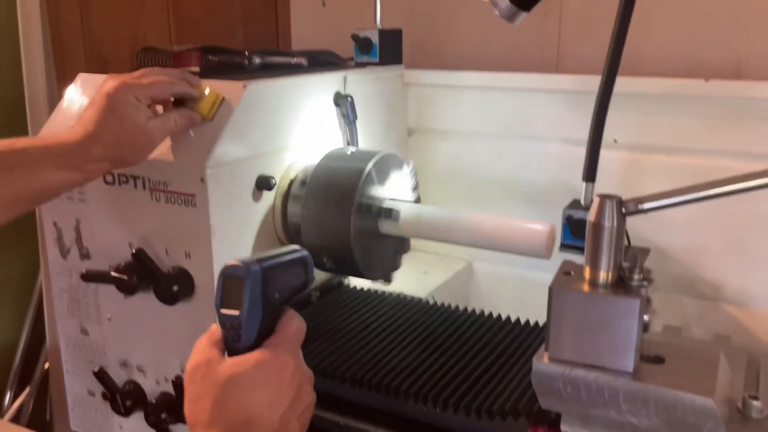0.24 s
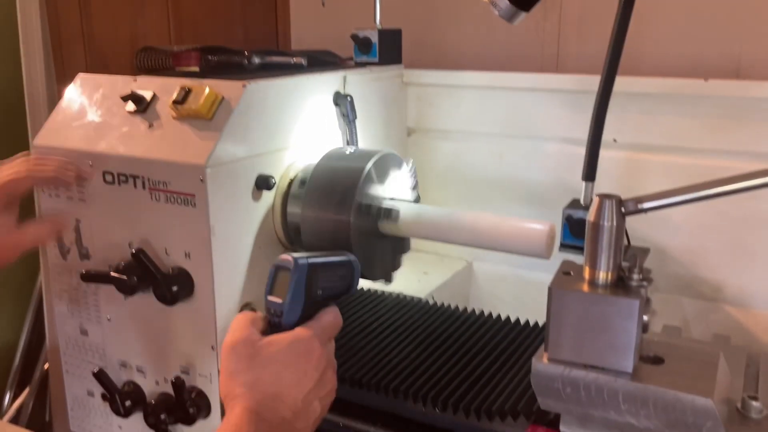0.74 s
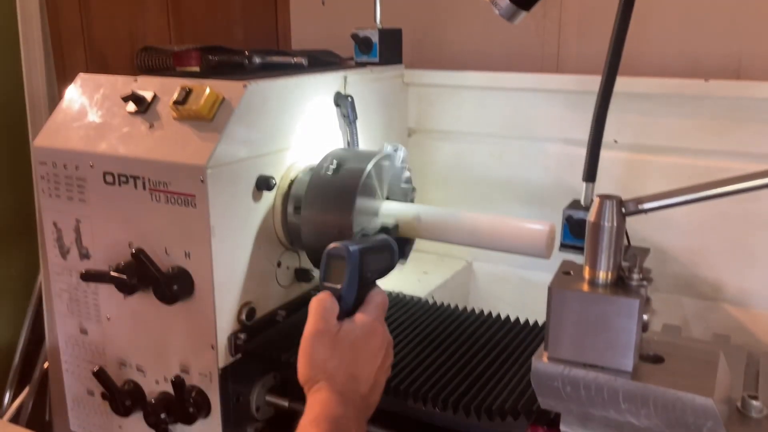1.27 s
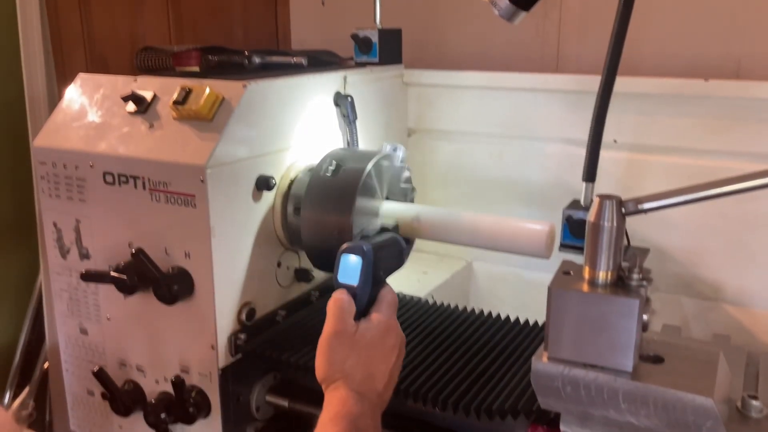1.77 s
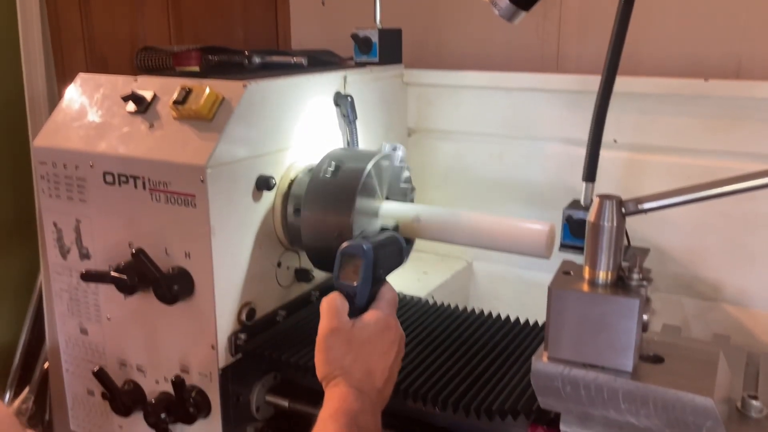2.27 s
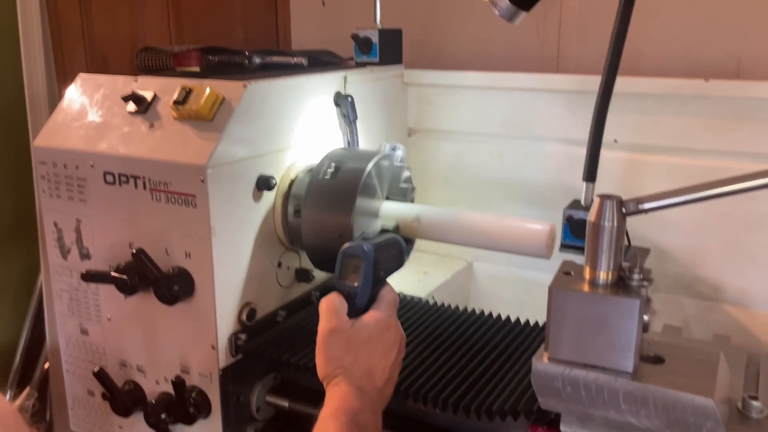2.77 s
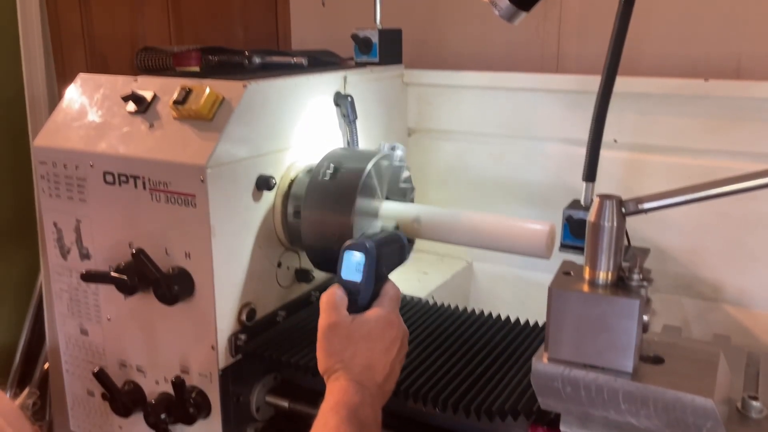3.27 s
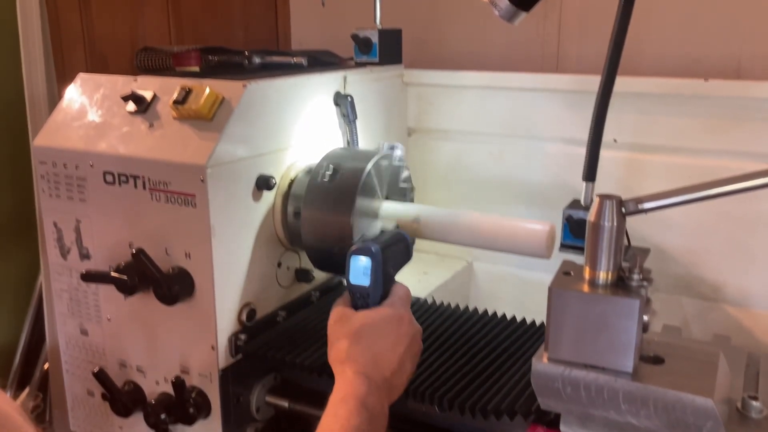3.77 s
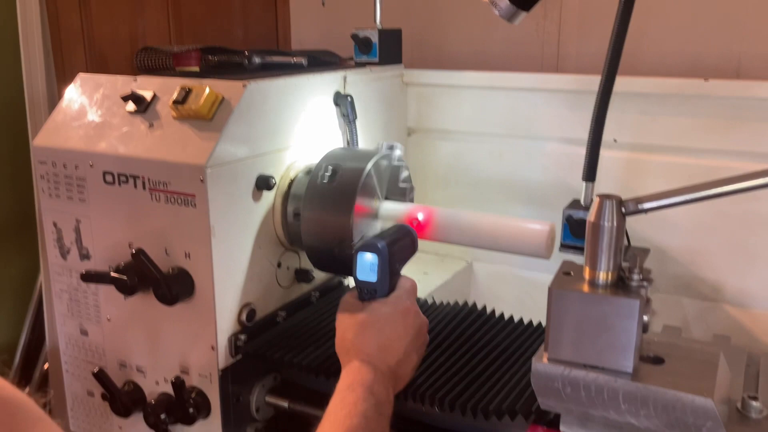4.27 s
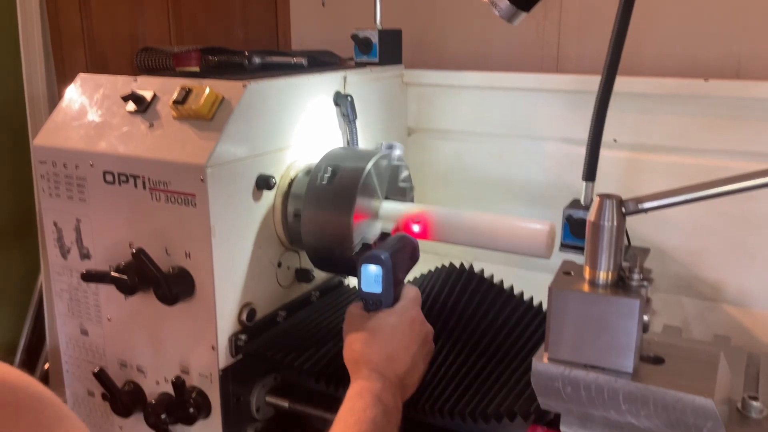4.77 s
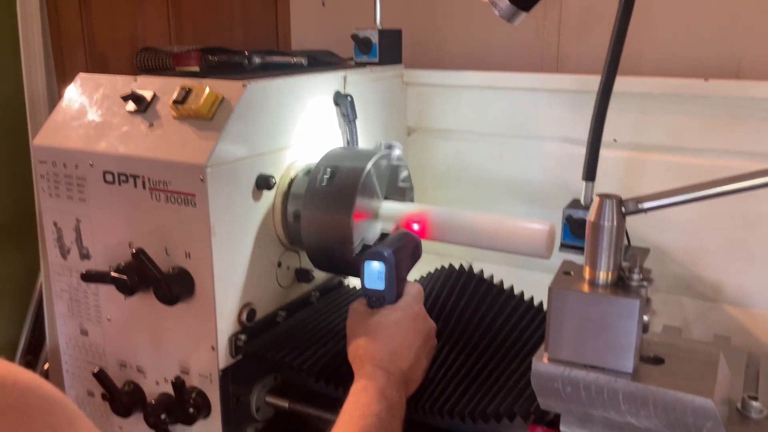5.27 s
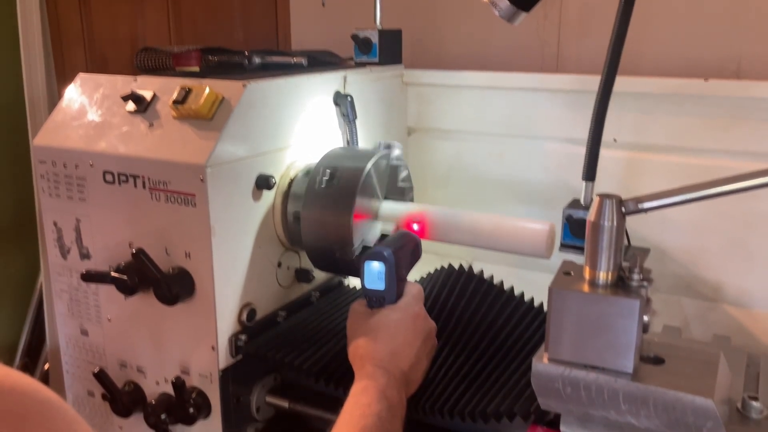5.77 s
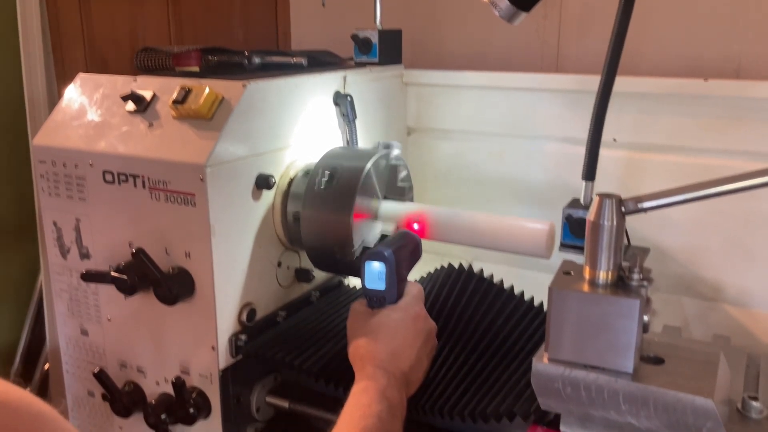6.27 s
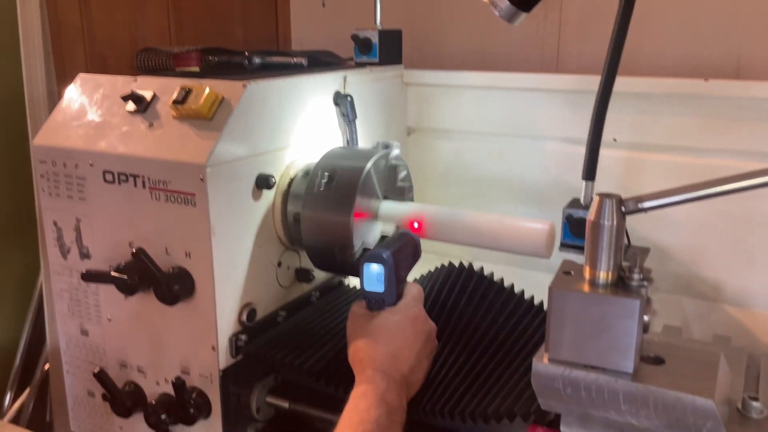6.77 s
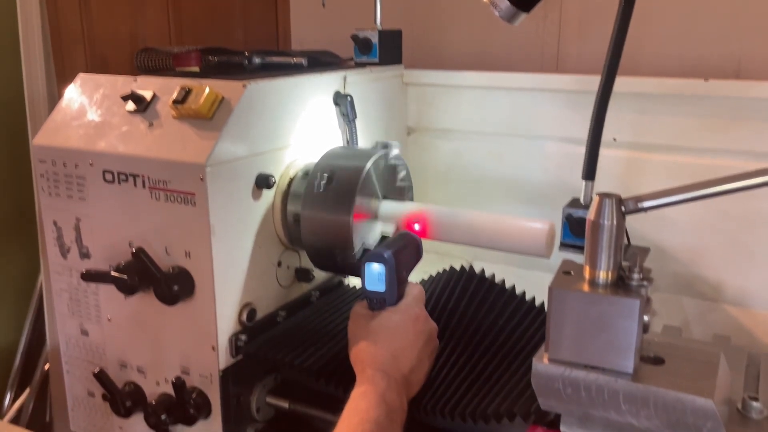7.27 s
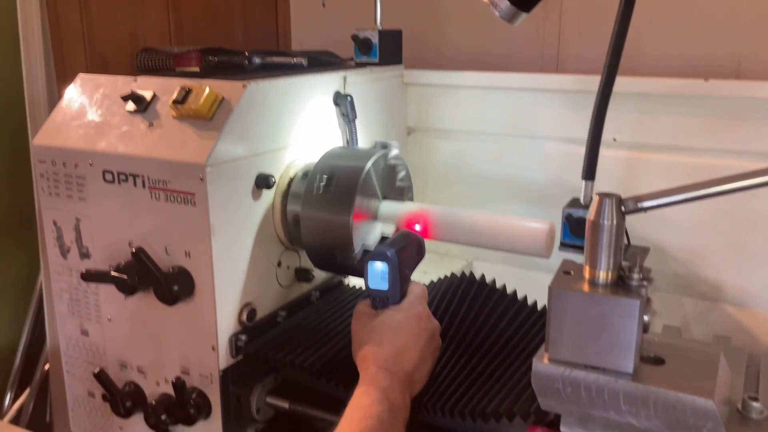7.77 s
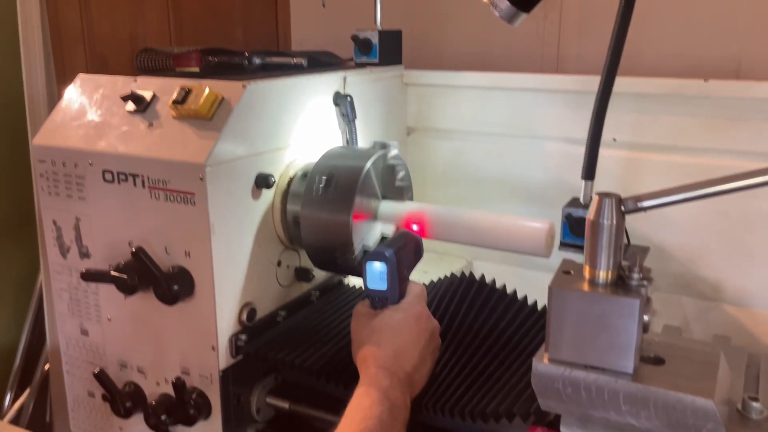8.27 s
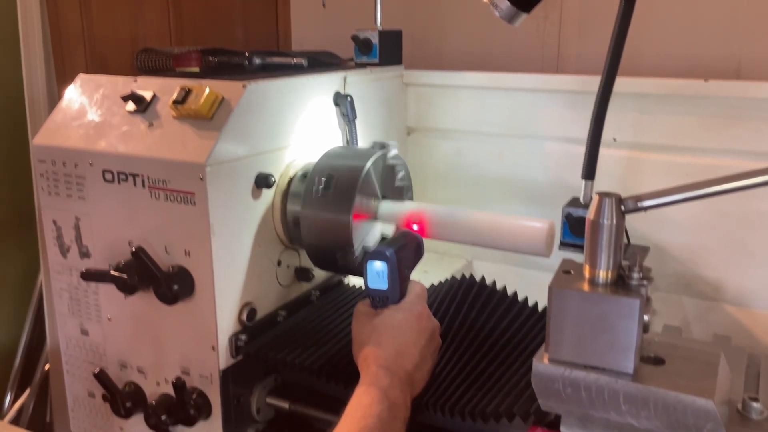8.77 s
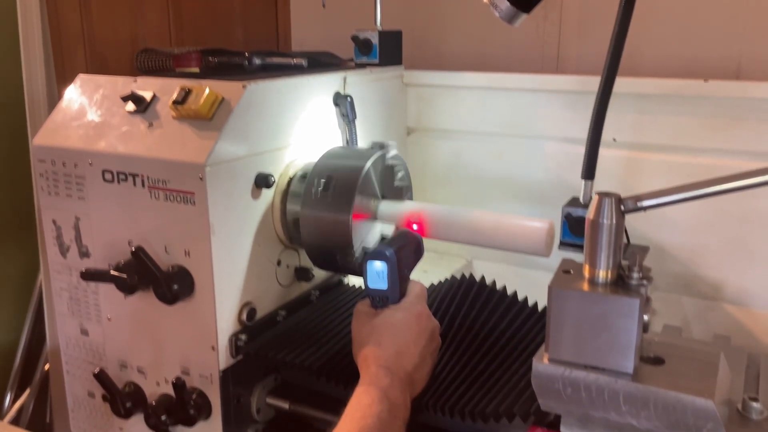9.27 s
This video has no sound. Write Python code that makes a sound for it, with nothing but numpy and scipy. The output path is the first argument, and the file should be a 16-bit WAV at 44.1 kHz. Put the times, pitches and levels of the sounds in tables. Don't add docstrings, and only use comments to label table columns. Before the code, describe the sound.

A small metal lathe starts with a thump and gear crash, then idles with steady hum, rough gear roar, loose rattling and a few plastic trigger clicks.

```python
import sys
import numpy as np
from scipy import signal
from scipy.fft import rfft, irfft, next_fast_len
from scipy.io import wavfile

SR = 44100
rng = np.random.default_rng(int(sys.argv[2]) if len(sys.argv) > 2 else 0)


def store_pcm(level_fs):
    pcm = np.round(np.clip(level_fs, -1, 1) * 32767).astype(np.int16)
    wavfile.write(sys.argv[1], SR, np.atleast_2d(pcm).T)


def level_to_linear(level):
    exponent = np.asarray(level, float) / 20
    return 10 ** exponent


N = 420273
SIZE = next_fast_len(N)
HZ = np.arange(SIZE // 2 + 1) * SR / SIZE


def rms_one(x):
    return x / np.sqrt(np.mean(x ** 2) + 1e-20)


def at_hz(points, hz):
    point_hz, value = np.transpose(points)
    return np.interp(np.log(hz), np.log(point_hz), value)


def coloured(spectrum, count):
    white = rfft(rng.standard_normal((count, SIZE)))
    return irfft(white * level_to_linear(at_hz(spectrum, HZ + 1)), SIZE)[:, :N]


def drift(rate_hz):
    r = np.exp(-80 * np.pi * rate_hz / SR)
    steps = rng.standard_normal(N // 40 + 2002)
    slow = signal.lfilter([1], [1, -2 * r, r * r], steps)[2000:]
    return np.interp(np.arange(N) / 40, np.arange(len(slow)), rms_one(slow))


def ring(clicks, hz, t60_s):
    r = level_to_linear(-60 / (t60_s * SR))
    w = 2 * np.pi * hz / SR
    return signal.lfilter([0, np.sin(w)], [1, -2 * r * np.cos(w), r * r], clicks + 1e-18)


def band(x, low_hz, high_hz):
    return signal.sosfilt(signal.butter(2, [low_hz, high_hz], "band", fs=SR, output="sos"), x)


def left_right(mid, side):
    return np.array([mid + side, mid - side])


def first_second(x):
    return np.pad(x, [(0, 0), (0, N - SR)])


def in_time(rows):
    s, value = np.transpose(rows)
    return np.interp(np.arange(N) / SR, s, value)


def swing(level_db):
    return level_db - np.median(level_db)


# pitch_hz, level_db (per Hz)
ROAR_COMMON = [(90, -33), (230, -10.5), (480, -4.5), (570, -8), (680, -1.5), (1200, -8.5), (1600, -9.5),
               (2600, -16), (3000, -20.5), (5000, -26), (5800, -34), (8000, -36.5), (11000, -41.5),
               (14900, -50), (15300, -72)]
# pitch_hz, level_db (per Hz)
ROAR_OPPOSITE = [(90, -57), (180, -41), (340, -31), (400, -17), (560, -17.5), (670, -9.5), (1300, -9),
                 (2600, -17.5), (3000, -22), (5000, -29), (6300, -36.5), (9000, -38.5), (14800, -53.5),
                 (15500, -66)]


def roar(roar_db, rattle_db, side_db, patchy_db):
    mid = coloured(ROAR_COMMON, count=2)
    side = level_to_linear(side_db) * coloured(ROAR_OPPOSITE, count=2)
    noise = np.stack([mid, side], axis=1)
    edges_hz = 80 * 2 ** np.arange(0, 8.1, 0.5)
    together = drift(16)
    out = 0
    for k, (low, high) in enumerate(zip(edges_hz, edges_hz[1:])):
        bright = np.clip(np.log2(low / 1100) / 6.6, 0, 1)
        load_db = (1 - bright) * swing(roar_db) + 0.84 * bright * swing(rattle_db)
        flicker_db = patchy_db * (0.67 * bright * together + drift(21))
        out = out + level_to_linear(load_db + flicker_db) * band(noise[k % 2], low, high)
    return rms_one(left_right(*out))


WHEEL_HZ = [1562, 1662, 2020, 2200, 2280, 2350, 2414, 2541, 2690, 2712, 3200, 3415, 3775, 3850, 4305, 4385]
# level_db, t60_s (time to fall 60 dB)
WHEEL_RING = [(0.5, 0.07), (5, 0.052), (-0.5, 0.13), (-9, 0.1), (-2, 0.078), (-2, 0.065), (-5, 0.16),
              (-4, 0.092), (-0.5, 0.045), (-2, 0.043), (-7, 0.044), (-5.5, 0.053), (-4.5, 0.049),
              (-4.5, 0.067), (-1.5, 0.063), (-3.5, 0.049)]


def rattle(rattle_db, per_s, level_db, spread_db):
    born = np.flatnonzero(rng.random(N) < per_s * level_to_linear(2.8 * drift(9)) / SR)
    luck = np.minimum(rng.exponential(1, len(born)), 2.5)
    sizes = level_to_linear(rattle_db[born] + level_db + spread_db * luck)
    hard, peak_db, hit_hz = tooth_blows(rattle_db)
    mid, side, blows = np.zeros((3, N))
    for k, (hz, (wheel_db, t60_s)) in enumerate(zip(WHEEL_HZ, WHEEL_RING)):
        loss_db = np.minimum(32 * np.abs(np.log2(hz / hit_hz)), 6)
        blow_db = peak_db - 8.5 - loss_db + rng.normal(0, 1.3, len(hard))
        blow_db = blow_db + 3.9 * (2600 < hz < 3000) - 5.5 * (hz < 2600)
        clicks = np.zeros(N)
        clicks[born] = sizes * rng.standard_normal(len(born))
        clicks[hard] += level_to_linear(blow_db + 5.5) * (-1) ** k
        wheel = level_to_linear(wheel_db) * ring(clicks, hz, t60_s)
        mid += wheel
        side += wheel * rng.uniform(-0.14, 1.0) * min(1, 1500 / hz)
    blows[born] = sizes * level_to_linear(-5.5)
    blows[hard] += level_to_linear(peak_db - 4.5)
    burst = signal.lfilter([1], [1, -level_to_linear(-60 / (0.047 * SR))], blows)
    crack = band(rng.standard_normal((2, N)), 4900, 10100)
    return left_right(mid, side) * level_to_linear(0.5), level_to_linear(-9.5) * burst * crack


CHATTER_DB = -49
# start_s, peak_db, pitch_hz (of the wheel hit)
HARD_BLOWS = [(0.4334, -31, 4330), (0.631, -30, 4300), (0.6923, -34.5, 4310), (0.9235, -32.5, 2670),
              (1.372, -27.5, 2700), (1.6457, -33, 4300), (2.1635, -32, 4310), (2.9214, -31, 2710),
              (3.044, -29, 2700), (3.2425, -30.5, 2710), (3.7229, -32.5, 4300), (3.7743, -33, 4390),
              (3.865, -29.5, 4290), (3.9627, -32.5, 2700), (4.1841, -31, 2710), (4.7845, -35, 4310),
              (5.0469, -27.5, 3830), (5.1863, -32, 2740), (5.4083, -28, 2720), (5.5523, -31, 3850),
              (5.6855, -42, 2700), (5.796, -36, 4380), (6.271, -34, 4300), (6.415, -31, 4390),
              (6.6538, -36, 2690), (6.9207, -31.5, 2700), (7.2529, -31.5, 2700), (7.971, -33, 4310),
              (8.116, -26.5, 4450), (8.423, -35, 2680)]


def tooth_blows(rattle_db):
    light_per_s, light_mean_db, light_spread_db = 11, -39, 0.4
    chance = light_per_s * level_to_linear(rattle_db - CHATTER_DB) / SR
    light = np.flatnonzero(rng.random(N) < chance)
    luck = rng.random((N // 1000, 2))[:len(light)]
    s, peak_db, hit_hz = np.transpose(HARD_BLOWS)
    light_hz = np.array([2700, 3800, 4350])[(3 * luck[:, 1]).astype(int)]
    light_db = light_mean_db + light_spread_db * (4 * luck[:, 0] - 2)
    hard = np.round(s * SR).astype(int)
    return np.r_[hard, light], np.r_[peak_db, light_db], np.r_[hit_hz, light_hz]


# start_s, peak_db, gap_ms (between touches)
CLUNKS = [(0.257, -49, 5), (0.865, -20.5, 7), (1.186, -35, 5), (1.616, -20.5, 6), (1.985, -23.5, 6),
          (2.883, -22, 5), (2.956, -24, 7), (3.372, -22.5, .1), (3.635, -23, 6), (4.096, -21, 4),
          (4.444, -25, 6), (4.535, -17, 7), (4.998, -25, .1), (5.555, -23, 4), (5.613, -21.5, .1),
          (5.684, -24, 5), (5.87, -29, 5), (6.268, -23, 5), (6.655, -22, 5), (6.915, -16, 7.5),
          (7.255, -21, 3), (7.348, -29, 6), (7.52, -25, 6), (7.617, -20, 6), (7.64, -20, 15),
          (8.12, -28, 4), (8.368, -18, 14), (8.524, -27, 5), (9.185, -17, 8), (9.294, -29, 5)]
# pitch_hz, level_db, t60_s
CLUNK_BODY = [(650, -10.5, 0.15), (845, 0, 0.027), (952, -8, 0.082), (1180, 5.5, 0.036), (1236, 6.5, 0.01),
              (1368, -0.5, 0.054), (1738, -9.5, 0.072)]


def clunks():
    s, peak_db, gap_ms = np.transpose(CLUNKS)
    touch_s = s[:, None] + gap_ms[:, None] / 1000 * np.arange(3)
    touches = np.round(touch_s * SR).astype(int)
    out = np.zeros((2, N))
    for hz, level_db, t60_s in CLUNK_BODY:
        touch_db = peak_db[:, None] - 15 + level_db + [-4, 0, -2]
        touch_db = touch_db + rng.normal(0, 2.0, touches.shape)
        clicks = np.zeros(N)
        clicks[touches] = level_to_linear(touch_db) * rng.choice([-1, 1], (len(s), 1))
        out += ring(clicks, hz, t60_s) * left_right(1, rng.uniform(-0.16, 0.63))[:, None]
    return out


# start_s, level_db
SLACK = [(0.35, -47), (1.19, -46), (1.6, -45.5), (1.83, -47.5), (2.73, -46), (3.18, -46), (3.47, -48.5),
         (3.95, -46.5), (4.18, -46), (5.49, -45.5), (5.74, -44.5), (6.38, -46.5), (8.02, -46.5),
         (8.22, -45), (8.53, -46), (9.53, -46)]


def controls():
    slack_db = swing(in_time(SLACK))
    start_db = 11 * np.exp(-np.arange(N) / SR / 0.088)
    s, peak_db, _ = np.transpose(CLUNKS)
    kicks = np.zeros(N)
    kicks[np.round(s * SR).astype(int)] = level_to_linear(peak_db + 6)
    swell_db = 4.7 * signal.lfilter([1], [1, -np.exp(-1 / (0.067 * SR))], kicks + 1e-18)
    wobble_hz = 6
    roar_db = start_db + 0.9 * slack_db + swell_db + 0.9 * drift(wobble_hz)
    rattle_db = CHATTER_DB + 0.35 * start_db + slack_db + 1.97 * drift(wobble_hz)
    return roar_db, rattle_db


# pitch_hz, width_hz, level_db, alike (left-right likeness, 0 to 1)
CASING = [(72.7, 11, -44.5, .98), (162.4, 1.8, -49.5, 0.79), (218.6, 52, -48, .98), (265.5, 11, -57, .98),
          (309, 25, -54, 0.9), (384, 21, -45, 0.56), (487, 30, -54, 0.24), (513.6, 14, -47, 0.36),
          (674, 4.5, -46.5, 0.31), (698.6, 18, -43.5, 0.46), (789, 17, -53.5, 0.64), (945, 31, -47, 0.12),
          (1039, 49, -44.5, 0.9), (1163, 90, -40.5, 0.86), (1297, 51, -43.5, 0.39)]


def casing(roar_db):
    out = np.zeros((2, N))
    white = rng.standard_normal((2, 2, N))
    for k, (hz, width_hz, level_db, alike) in enumerate(CASING):
        t60_s = np.log(1000) / np.pi / width_hz
        mid, side = ring(white[k % 2], hz, t60_s)
        panel = left_right(np.sqrt(1 + alike) * mid, np.sqrt(1 - alike) * side)
        out += level_to_linear(level_db) * rms_one(panel)
    return band(out, 96, 1630) * level_to_linear(0.97 * swing(roar_db))


HUM_DB = [-23, -33.5, -41.5, -41.5, -50, -45.5]
# multiple, left_minus_right_db, left_lag_ms
HUM_PLACE = [(1, -4.1, .16), (2, 2.2, .45), (3, -.9, -.05), (4, 2.7, -.26), (6, 1, .03), (8, 1, 0)]


def hum():
    hum_hz = 99.95
    t = np.arange(N) / SR - 0.0006
    out = np.zeros((2, N))
    for level_db, (k, pan_db, lag_ms) in zip(HUM_DB, HUM_PLACE):
        turn = 2 * np.pi * k * hum_hz
        shift = np.pi / 2 * (k > 1)
        out[0] += level_to_linear(level_db + pan_db / 2) * np.cos(turn * (t - lag_ms / 2000) - shift)
        out[1] += level_to_linear(level_db - pan_db / 2) * np.cos(turn * (t + lag_ms / 2000) - shift)
    return out * level_to_linear(0.082 * drift(5.2) + 0.3 * drift(3.7))


# pitch_hz, level_db, t60_s, start_s
THUMP = [(73.4, -16.5, 0.59, 0.0062), (123, -20.5, 0.54, 0.0192), (158.4, -22, 0.47, 0.0017),
         (226, -27, 0.58, 0.0033), (290, -26, 0.42, 0.0011), (496, -25.5, 0.52, 0.0019)]


def start_thump():
    out = np.zeros((2, SR))
    for hz, level_db, t60_s, start_s in THUMP:
        t = np.maximum(np.arange(SR) / SR - start_s, 0)
        rise = 1 - np.exp(-t * hz / 3.6)
        out += level_to_linear(level_db - 60 * t / t60_s) * rise * np.sin(2 * np.pi * hz * t)
    return first_second(out)


def start_clatter():
    t = np.arange(SR) / SR
    grains = rng.standard_normal((2, SR))
    contacts = grains * (0.31 + (rng.random(SR) < 900 / SR) * 2.4)
    crash = rms_one(band(band(contacts, 220, 2500), 150, 8300))
    large_wheel = rms_one(band(contacts, 2300, 2780))
    fade_db = -60 * np.maximum(t - 0.04, 0) / 0.5
    return first_second(level_to_linear(-32 + fade_db) * (crash + level_to_linear(-6) * large_wheel))


# start_s, peak_db
TICKS = [
    (1.8365, -35),
    (3.2215, -37),
    (3.2425, -50),
    (4.0946, -39),
    (8.1155, -46),
]


def trigger():
    clicks = np.zeros(N)
    for s, peak_db in TICKS:
        clicks[round(s * SR)] = level_to_linear(peak_db + 12)
        clicks[round((s + 0.0016) * SR)] = -level_to_linear(peak_db + 10)
    snap = band(clicks + 1e-18, 6000, 19000)
    return snap * level_to_linear([[1.5], [-1.5]]) * [[1], [0.1]]


# start_s, level_db
FLOOR_SHAKE = [
    (0.0, -44),
    (0.08, -48),
    (1.25, -60),
    (5.94, -49),
    (6.53, -60),
    (8.84, -60),
    (9.45, -64),
    (9.53, -51),
]


def rumble(level_db):
    mid, side = band(band(rng.standard_normal((2, N)), 36, 49), 30, 62)
    return level_to_linear(level_db) * left_right(rms_one(mid), level_to_linear(-22) * rms_one(side))


def shop(x):
    t60_s, wall_cut_hz = 0.4, 8000
    size = next_fast_len(N + SR)
    hz = np.arange(size // 2 + 1) * SR / size
    out = np.zeros((2, size // 2 + 1), complex)
    for k, lag_s in enumerate(rng.uniform(0.012, 0.04, size=8)):
        delay = np.exp(-2j * np.pi * hz * lag_s)
        loop = level_to_linear(-60 * lag_s / t60_s) * delay / (1 + 1j * hz / wall_cut_hz)
        out[k % 2] += loop / (1 - loop) * (-1) ** (k // 2)
    return irfft(out * rfft(x, size), size)[:, :N]


def ports(x, leak_db):
    null_hz, spacing_hz = 9200, 4300
    turn = np.pi * (HZ - null_hz) / spacing_hz
    blur = np.clip(level_to_linear(leak_db) + (6900 - HZ) / 1300, level_to_linear(leak_db), 1)
    even, comb = blur ** 2 / 2, 1 - blur ** 2
    mid = rfft(x[0] + x[1], SIZE) * np.sqrt(even + comb * np.sin(turn) ** 2)
    side = rfft(x[0] - x[1], SIZE) * np.sqrt(even + comb * np.cos(turn) ** 2)
    return left_right(irfft(mid, SIZE)[:N], irfft(side, SIZE)[:N]) / np.sqrt(2)


def scene():
    roar_db, rattle_db = controls()
    wheels, cracks = rattle(rattle_db, per_s=230, level_db=-10.5, spread_db=4.0)
    struck = wheels + clunks()
    gears = level_to_linear(-34) * roar(roar_db, rattle_db, side_db=3.04, patchy_db=1.61)
    motor = hum() + rumble(in_time(FLOOR_SHAKE)) + start_thump() + casing(roar_db)
    shop_echo = level_to_linear(-12) * band(shop(struck.sum(axis=0)), 460, 4840)
    far = ports(gears + struck + cracks + shop_echo + start_clatter(), leak_db=-13.5)
    far = signal.sosfilt(signal.butter(8, 15050, fs=SR, output="sos"), far)
    return motor + far + trigger()


def roll_off(x):
    return signal.sosfilt(signal.butter(12, 15750, fs=SR, output="sos"), x)


def record(dry):
    return roll_off(dry)


dry = scene()
out = record(dry)
store_pcm(out)
```